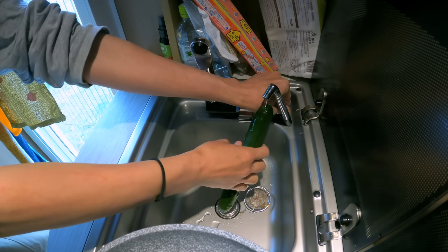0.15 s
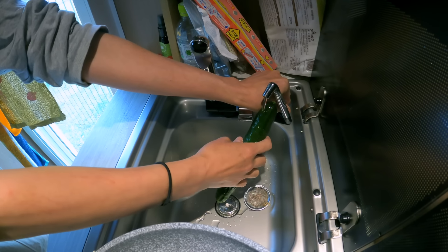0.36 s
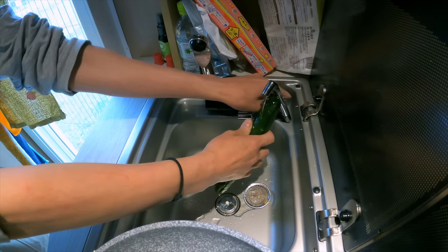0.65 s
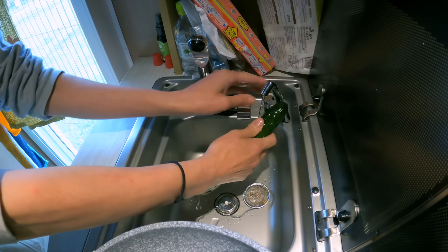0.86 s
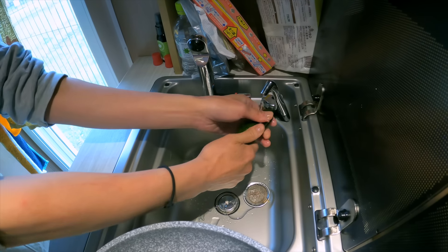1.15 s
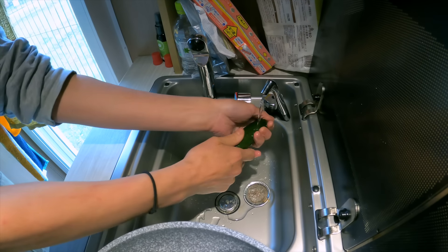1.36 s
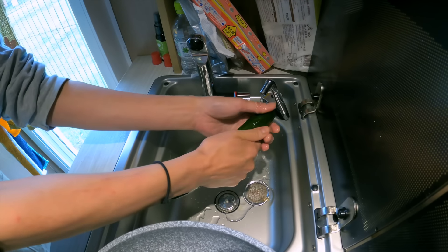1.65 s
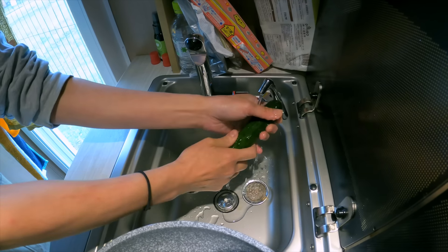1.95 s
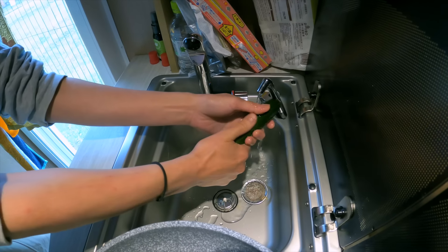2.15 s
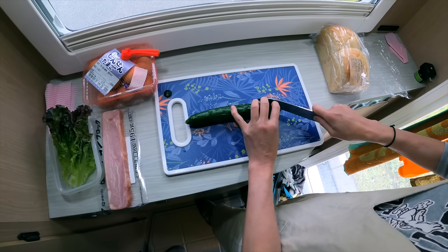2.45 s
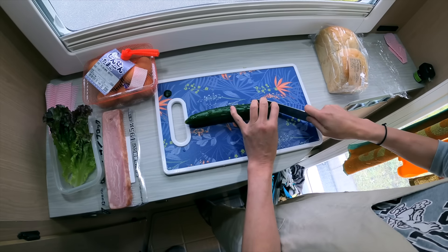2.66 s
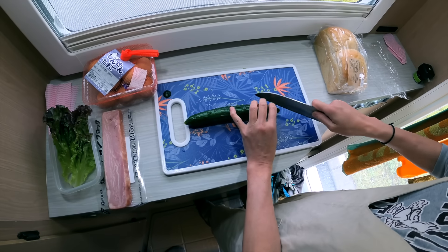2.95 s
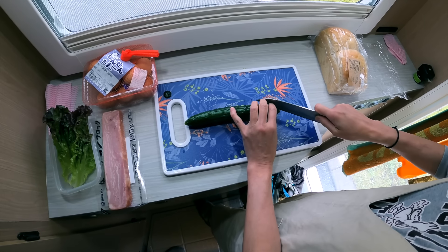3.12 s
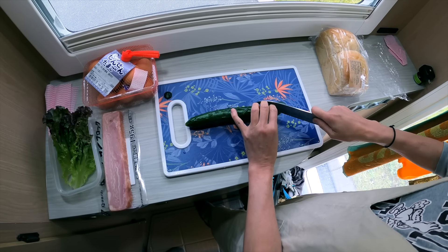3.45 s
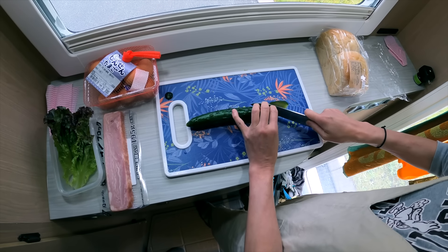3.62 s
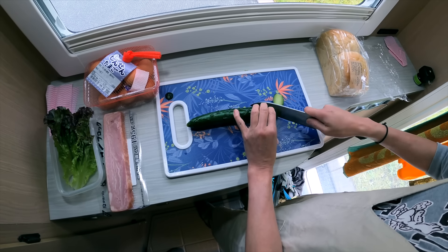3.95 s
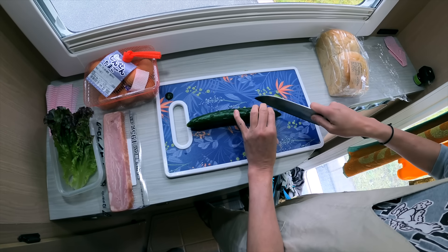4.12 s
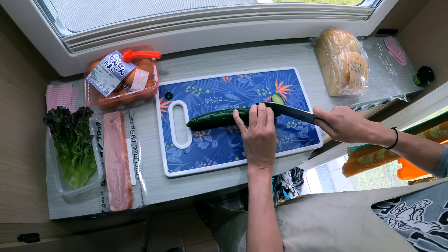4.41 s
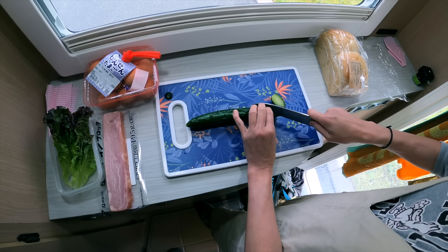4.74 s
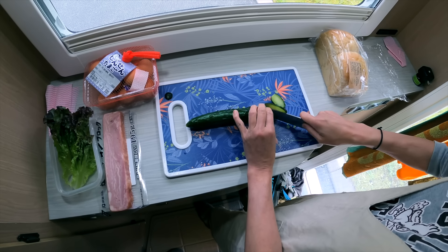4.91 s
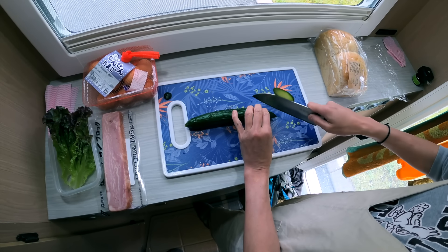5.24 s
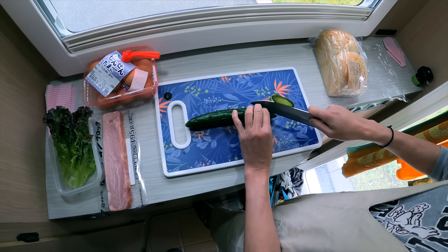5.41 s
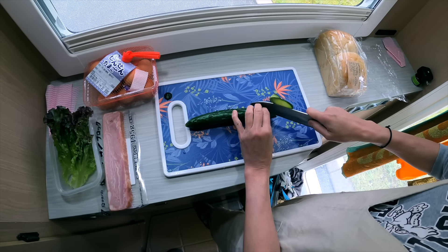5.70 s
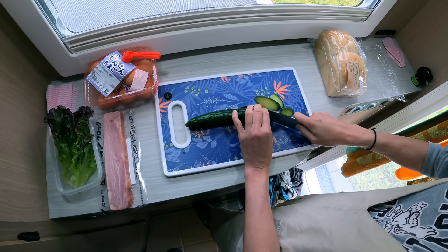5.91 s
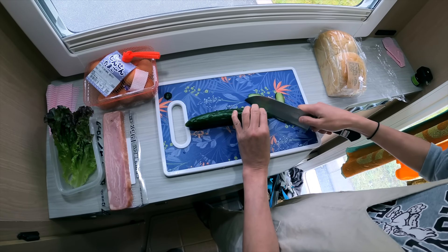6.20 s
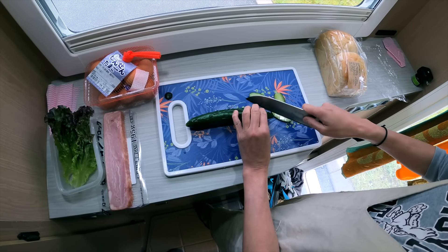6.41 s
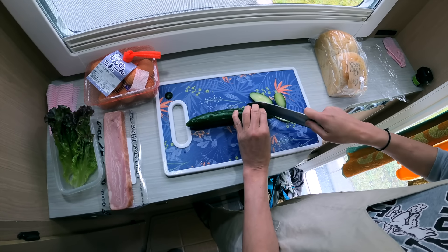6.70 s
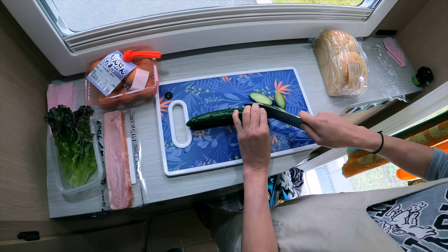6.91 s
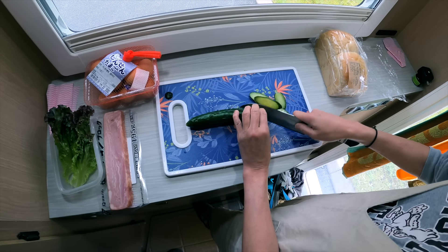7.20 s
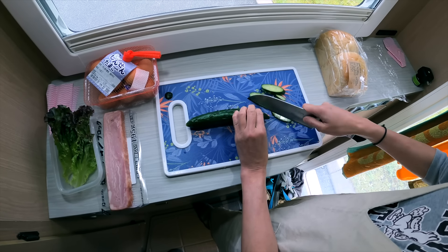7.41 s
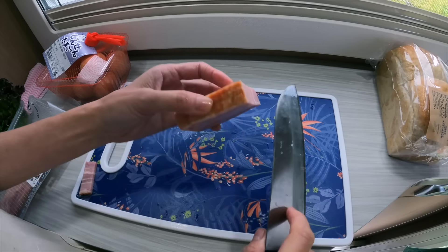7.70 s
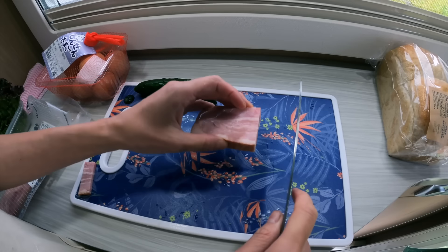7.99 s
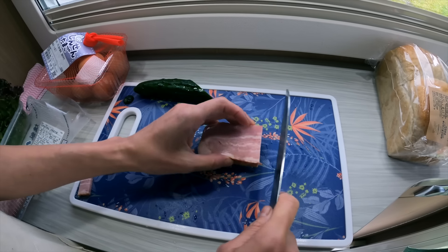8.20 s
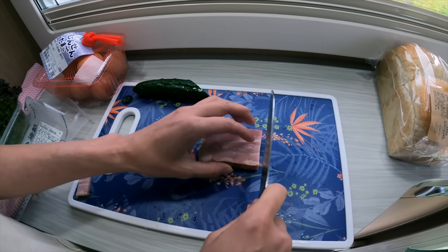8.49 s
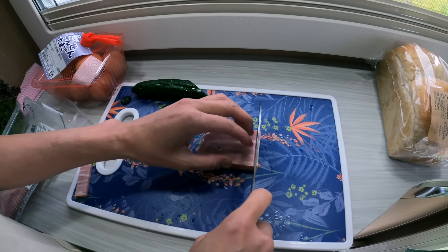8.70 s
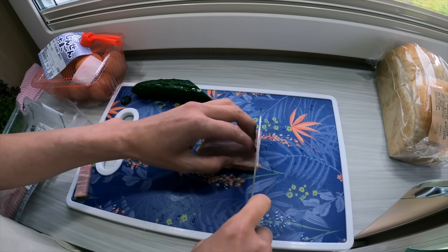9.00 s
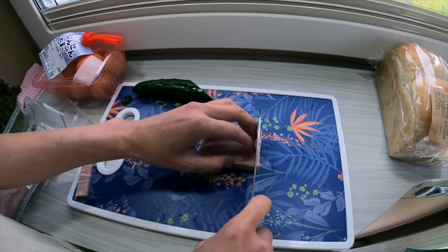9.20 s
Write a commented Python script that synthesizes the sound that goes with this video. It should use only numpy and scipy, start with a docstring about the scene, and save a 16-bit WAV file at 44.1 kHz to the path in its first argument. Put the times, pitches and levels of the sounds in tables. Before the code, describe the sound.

Water sprays into a metal sink as a pump hums, followed by five crunchy cucumber cuts knocking on a board in a small kitchen.

```python
"""A pump hums and a tap rinses a cucumber over a steel sink, with bumps, splats and drips, heard from
inside a small camper kitchen. Then, straight ahead of the stereo microphone, a knife slices the cucumber
five times: a wet hiss of bursting cells, a swelling crunch and a knock that rings the cutting board.
Slices topple and the blade taps the board. Close walls add a short tail; outside, a bird chirps faintly
over a low rumble."""
import sys
import numpy as np
from scipy import signal
from scipy.fft import rfft, irfft, next_fast_len
from scipy.io import wavfile
from scipy.ndimage import map_coordinates

SR = 44100
rng = np.random.default_rng(int(sys.argv[2]) if len(sys.argv) > 2 else 0)


def master(y):
    """Save y as 16-bit WAV."""
    cut = np.clip(np.atleast_2d(y).T, -1, 1)
    pcm = np.round(cut * 32767)  # scale
    wavfile.write(sys.argv[1], SR, pcm.astype(np.int16))


N = 412335

# Reverberation of the cabin. Each row: frequency in Hz, time to decay by 60 dB in seconds.
CABIN_DECAY = [(150, .25), (600, 0.06), (2000, 0.076), (5000, 0.08), (12000, 0.035)]
# Rumble and hiss from outside. Each row: frequency in Hz, gain in dB.
RUMBLE_SPECTRUM = [(12, -25), (20, -1), (70, -1), (97, -15.5), (121, -8), (140, 3), (173, -11.5),
                   (210, -13.5), (251, -31.5), (313, -20), (380, -31.5), (468, -30), (505, -43.5),
                   (552, -33), (700, -46), (910, -73.5), (1540, -120)]
HISS_SPECTRUM = [(130, -37.5), (220, 2), (232, -5.5), (308, -3), (374, -8.5), (408, -5), (694, -33.5),
                 (888, -29.5), (1220, -22.5), (1510, -23.5), (1800, -27), (2610, -36), (5780, -32.5),
                 (10500, -51), (15000, -70)]
# Course of the hiss. Each row: time in seconds, relative level in dB.
HISS_LEVEL = [(0, -70), (3.2, -81), (5.3, -80), (7.7, -77), (8.15, -70.5), (9.35, -71)]
# The bird beyond the walls. Each row: start in seconds, relative level in dB.
CHIRPS = [(3.213, -56.5), (4.53, -50), (5.674, -53.5), (7.632, -54.5)]
PIPS = [(7.327, -65), (7.975, -60.5), (8.038, -57.5), (8.362, -61), (8.43, -59), (8.728, -65), (8.791, -62),
        (8.852, -55.5)]

# The running tap. Each row: time in seconds, relative levels of spray and pump in dB.
FLOW = [(0, -58.5, -43), (.7, -55.5, -41), (2.1, -58, -43.5), (2.6, -56, -48.5)]
# Water spraying off the hands. Each row: frequency in Hz, gain in dB.
SPRAY_SPECTRUM = [(150, -37), (250, -1), (282, 3.5), (347, -10), (392, -10), (534, -8.5), (795, -27.5),
                  (882, -9.5), (1140, -27), (1560, -13.5), (1980, -23.5), (2950, -17.5), (5690, -21.5),
                  (11900, -36), (15500, -52.5)]
# Tones of the pump. Each row: multiple of the shaft rate, relative level in dB.
PUMP_HARMONICS = [(1, 3), (2, -32.5), (3, -22.5), (5, -19.5)]
# The steel basin and the high modes of its wall. Each row: frequency and nominal width in Hz, gain in dB.
SINK_MODES = [(61.6, 14, -3), (147, 13.4, 10), (168.6, 23.3, 5), (320, 34, -22.5), (391.2, 27.4, -11),
              (555, 50, -16.5), (968, 108, -20.5)]
SINK_WALL_MODES = [(675, 49, -12), (975, 30, -1), (1388, 28, -19.5), (1560, 69, -6)]
# Bumps on the sink. Each row: start in seconds, relative levels of the bump and its upper modes in dB.
BUMPS = [(0.713, -22.5, -15.5), (0.975, -18, -12.5), (1.382, -17.5, -18), (1.415, -21, 12),
         (1.904, -20.5, -20.5), (2.165, -24.5, -23)]
# Gobs of water landing. Each row: start in seconds, relative levels of steel ring and splash in dB.
SPLATS = [(.649, -37, -49), (.672, -42, -44), (0.738, -20.5, -28), (1.007, -37.5, -26.5),
          (1.411, -46, -40.5), (1.648, -43.5, -29.5), (2.166, -48, -72), (2.279, -46.5, -53.5),
          (2.347, -42, -53)]
# Single drips. Each row: start in seconds, relative level in dB, pitch in Hz.
DRIPS = [(0.451, -39.5, 7900), (0.47, -38, 4330), (1.411, -48, 3980), (1.629, -31.5, 5700),
         (2.097, -41.5, 6460), (2.306, -28.5, 6840), (2.447, -31, 3740), (2.527, -36.5, 3260),
         (2.724, -31, 6100), (2.771, -46, 7560)]

# The cutting board on its counter. Each row: frequency and nominal width in Hz, gain in dB.
BOARD_MODES = [(91.67, 12, 0), (148.4, 8.3, 4), (191.3, 24, 4.5), (282, 39, 10.5), (358, 17, -1),
               (471, 18, -4), (538, 33, 3), (629, 24, 1), (759.7, 30, 0.5), (849, 26, -9), (985, 90, -2),
               (1001, 57, 3.5), (1193, 46, -3.5), (1395, 28, -15.5), (1520, 140, -8), (1874, 24, -9.5),
               (1927, 70, -8), (2197, 70, -15), (2820, 40, -18.5), (3350, 77, -16), (3670, 120, -16.5),
               (3960, 43, -19)]
# Hands, food and blade rubbing. Each row: start and length in seconds, centre in Hz, relative level in dB.
RUBS = [(.41, 0.19, 345, -49), (4.383, 0.037, 5000, -68), (4.447, 0.042, 3340, -65.5),
        (5.074, .035, 5500, -71.5), (6.488, 0.058, 5410, -73.5), (6.55, .07, 6870, -64.5),
        (7.25, .09, 6300, -73.5), (8.041, .08, 5000, -72), (8.28, 0.042, 11080, -72.5),
        (8.311, 0.18, 150, -50), (8.322, 0.043, 454, -53)]
# Blade and slices touching down. Each row: time in seconds, relative low, middle and tick levels in dB.
LIGHT_TAPS = [(3.221, -50.5, -59, -66), (3.854, -33, -44, -63), (3.878, -29.5, -33.5, -68),
              (3.924, -26.5, -43, -67), (3.982, -35, -54, -65.5), (4.023, -39.5, -58.5, -61.5),
              (4.399, -49.5, -63.5, -67), (5.543, -38, -56.5, -74), (6.049, -26.5, -36.5, -55),
              (6.083, -27, -24.5, -54), (6.105, -30, -39, -46), (6.133, -33.5, -32, -57),
              (6.168, -27.5, -22, -49), (6.221, -41, -38, -64), (6.234, -34, -42, -65),
              (7.174, -43, -74, -53), (7.203, -46.5, -57, -45), (7.41, -38, -40, -56),
              (7.444, -34, -43.5, -47.5), (7.504, -41, -39, -57), (7.615, -67, -73, -60),
              (7.651, -46.5, -63, -65), (8.329, -41, -56, -63)]
# A light tick, wet flesh, breaking skin and the edge on the board. Each row: frequency in Hz, gain in dB.
TICK_SPECTRUM = [(1200, -22), (2500, 1.5), (4000, 1.5), (7000, -6), (9000, -18), (13000, -29),
                 (15500, -41.5)]
FLESH_SPECTRUM = [(120, -18), (280, -1.5), (550, -4), (800, -0.5), (1300, -16), (1900, -8.5), (2700, -18),
                  (4200, -16.5), (7500, -25), (9000, -33), (13000, -39.5), (15500, -46.5)]
CRUNCH_SPECTRUM = [(120, -46.5), (200, -7), (462, -10), (797, -7), (1450, -7), (1880, -1), (2420, -4),
                   (4570, -10.5), (5200, -19.5), (7210, -23.5), (8650, -41.5), (15500, -63)]
EDGE_SPECTRUM = [(100, -22.5), (400, -8.5), (900, 8), (1400, -5.5), (2000, 1), (2800, -14), (4000, -12.5),
                 (5500, -26.5), (8000, -39), (15000, -54.5)]
# The blade sliding through. Each row: start, time to bite in and end in seconds,
# relative levels of the stroke and of the skin's treble in dB.
STROKES = [(3.4, .11, 3.685, -50.5, -1.5), (4.725, 0.065, 4.935, -49.5, -2), (5.755, .07, 5.98, -50.5, 0.5),
           (6.85, 0.094, 7.06, -48, 3)]
# The blade landing. Each row: time in seconds, relative levels of knock, thud and crunch in dB,
# time for the crunch to swell by 60 dB in seconds.
CHOPS = [(2.678, -5, 3, -20, 0.073), (3.7676, 0, 0, -12.5, 0.064), (4.9375, -0.5, -3.5, -17, 0.065),
         (5.9692, -0.5, -4.5, -23, .06), (7.062, -2, -7.5, -29, 0.059)]

# Scatter reaching the microphone from the sides. Each row: frequency in Hz, side gain in dB.
SINK_SIDE = [(60, -15.5), (150, -29.5), (380, -18.5), (950, -11), (2380, -6), (5980, -8.5), (15000, -10.5)]
BOARD_SIDE = [(60, -27), (150, -31.5), (380, -30.5), (950, -22.5), (2380, -19.5), (5980, -16.5),
              (15000, -4)]
OUTDOOR_SIDE = [(60, -23), (150, -28), (380, -12.5), (950, -8), (2380, -5.5), (5980, -10), (15000, -3.5)]
# Treble response of the microphone. Each row: frequency in Hz, gain in dB.
MIC_RESPONSE = [(12000, -1), (13500, 2.5), (15500, -8.5)]

WATER_FADE_S, WATER_END_S = 2.55, 2.993  # the stream and pump die away between these times


def amp(db):
    return 10 ** (np.asarray(db) / 20)


def unit_rms(x):
    return x / np.sqrt(np.mean(x ** 2) + 1e-20)


def unit_peak(x):
    return x / np.abs(x).max()


def seconds(size):
    return np.arange(size) / SR


def fade(t, t60):
    """Exponential decay by 60 dB in t60."""
    return 1000.0 ** (-t / t60)


def rise(t, tau):
    """Soft onset with time constant tau."""
    return 1 - np.exp(-t / tau)


def along(points, hz):
    """Interpolate (Hz, value) points on a log axis."""
    freqs, values = np.transpose(points)
    return np.interp(np.log(hz + 1), np.log(freqs), values)


def curves(rows):
    """One value per sample for each column after the time."""
    times, *columns = np.transpose(rows)
    return [np.interp(seconds(N), times, column) for column in columns]


def gate(start, end, ramp):
    """1 between two times, dying smoothly outside."""
    t = seconds(N)
    outside = np.maximum(np.maximum(start - t, t - end), 0)
    return np.exp(-outside / ramp)


def add(track, start, sound):
    """Mix a sound in at a time in seconds."""
    part = track[round(start * SR):][:len(sound)]
    part += sound[:len(part)]


def wobble(rate, size=N):
    """A smooth random curve, rate knots a second."""
    knots = rng.standard_normal(int(size * rate / SR) + 4)
    return map_coordinates(knots, [seconds(size) * rate])


def grains(rate, spread_db, size=N):
    """Random tiny impulses of uneven strength, rate a second."""
    hits = rng.random(size) < rate / SR
    return hits * rng.standard_normal(size) * amp(spread_db * rng.standard_normal(size))


def noise_burst(t, t60):
    return rng.standard_normal(len(t)) * fade(t, t60)


def filtered(x, response):
    """x through a complex response of frequency."""
    size = next_fast_len(len(x) + SR // 4)
    return irfft(rfft(x, size) * response(np.fft.rfftfreq(size, 1 / SR)), size)[:len(x)]


def coloured(x, spectrum):
    """Minimum-phase filter with the gain of (Hz, dB) points."""
    size = 4096
    gain = amp(along(spectrum, np.fft.rfftfreq(size, 1 / SR)))
    cepstrum = irfft(np.log(gain))
    cepstrum[1:size // 2] *= 2
    cepstrum[size // 2 + 1:] = 0
    return signal.fftconvolve(x, irfft(np.exp(rfft(cepstrum))))[:len(x)]


def resonate(x, modes):
    """x through (Hz, width, dB) resonances of alternating sign, each at least 2.8% wide."""
    def mode(f, hz, width, db):
        damping = 1j * f * max(width, 0.028 * hz)
        return amp(db) * damping / (hz * hz - f * f + damping)
    return filtered(x, lambda f: sum((-1) ** k * mode(f, *row) for k, row in enumerate(modes)))


def softened(x, hz, order=2):
    """Low-pass: a soft contact excites little treble."""
    return signal.sosfilt(signal.butter(order, hz, fs=SR, output="sos"), x)


def split(x, hz):
    """The parts of x below and above a frequency."""
    high_pass = signal.butter(4, hz, "high", fs=SR, output="sos")
    return softened(x, hz, order=4), signal.sosfilt(high_pass, x)


def band_noise(size, hz, width):
    """Noise of rms 1 in one band with steep skirts."""
    band = [(hz, width, 0)]
    return unit_rms(resonate(resonate(rng.standard_normal(size), band), band))


def reflected(x, tail):
    """x smeared by a tail of unit energy."""
    return signal.fftconvolve(x, tail / np.linalg.norm(tail))[:len(x)]


def cabin(x, wet_db):
    """Close walls add a short dense tail, 2.5 ms behind the direct sound."""
    hz, t, noise = signal.stft(rng.standard_normal(SR // 4), SR, nperseg=128)
    tail = signal.istft(noise * fade(t, along(CABIN_DECAY, hz)[:, None]), SR, nperseg=128)[1]
    return x + amp(wet_db) * reflected(x, np.pad(tail, (SR // 400, 0)))


def outdoor_air():
    """Farthest back, a low rumble and a thin hiss from outside."""
    hiss_db, = curves(HISS_LEVEL)
    rumble = amp(-48.5 + 1.1 * wobble(7.6)) * unit_rms(coloured(rng.standard_normal(N), RUMBLE_SPECTRUM))
    hiss_gain = amp(hiss_db + 12.5 + 0.64 * wobble(8.3))
    return rumble + hiss_gain * unit_rms(coloured(rng.standard_normal(N), HISS_SPECTRUM))


def whistle(length_s, from_hz, to_hz, buzz):
    """One gliding bird note with a fast flutter in its pitch."""
    t = seconds(int(length_s * SR))
    flutter = buzz * np.sin(2 * np.pi * 190 * t) + 0.025 * wobble(600, len(t))
    hz = np.linspace(from_hz, to_hz, len(t)) * (1 + flutter)
    return np.hanning(len(t)) * np.sin(2 * np.pi * np.cumsum(hz) / SR)


def bird():
    """Buzzy falling chirps, short pips and a twitter, blurred by walls and a faint outdoor echo."""
    song = np.zeros(N)
    for start, db in CHIRPS:
        add(song, start, amp(db) * whistle(length_s=0.088, from_hz=5550, to_hz=3000, buzz=0.085))
    for start, db in PIPS:
        add(song, start, amp(db) * whistle(length_s=0.035, from_hz=4400, to_hz=4200, buzz=0.025))
    for start in 7.865 + 0.024 * np.arange(3):  # a twitter of downward flicks
        add(song, start, amp(-58.5) * whistle(length_s=0.0208, from_hz=5600, to_hz=3200, buzz=0.025))
    echo = reflected(song, noise_burst(seconds(SR // 2), t60=0.45))
    return amp(-6.5) * cabin(song, wet_db=1) + amp(-14.5) * echo


def pump(shaft_hz):
    """The water pump hums at multiples of its slightly unsteady shaft rate."""
    phase = 2 * np.pi * np.cumsum(shaft_hz * (1 + 0.0024 * wobble(14))) / SR
    return unit_rms(sum(amp(db + 1.7 * wobble(17)) * np.sin(k * phase) for k, db in PUMP_HARMONICS))


def droplets(count, hz, spread_db):
    """Tiny bubbles ring for a few cycles, each at its own pitch."""
    out, t = np.zeros(N), seconds(SR // 50)
    starts = rng.uniform(0, WATER_FADE_S, count)
    for start, (pitch, strength) in zip(starts, rng.standard_normal((count, 2))):
        cycles = t * min(hz * np.exp(0.4 * pitch), 12000)
        ping = np.sin(2 * np.pi * cycles) * fade(cycles, t60=16) * rise(cycles, tau=2)
        add(out, start, amp(spread_db * strength) * ping)
    return cabin(out, wet_db=4.5)


def running_tap():
    """The pump hums; its stream sprays off the hands, spits droplets and drums on the sink."""
    spray_db, pump_db = curves(FLOW)
    drops = coloured(grains(rate=8800, spread_db=1.5), SPRAY_SPECTRUM)
    spray = unit_rms(cabin(drops, wet_db=-7.5))
    spray *= amp(spray_db + 4 + 0.7 * wobble(10) + 1.1 * wobble(32))
    spit = amp(spray_db + 14.5) * droplets(count=220, hz=5800, spread_db=3.5)
    basin = resonate(grains(rate=550, spread_db=1), SINK_MODES)
    drum = amp(spray_db + 18) * unit_rms(softened(basin, hz=1012))
    hum = amp(pump_db + 4) * pump(shaft_hz=172.3)
    dying = np.interp(seconds(N), [WATER_FADE_S, WATER_END_S], [1, 0]) ** 1.5
    return (spray + spit + drum + hum) * dying


def sink_bumps():
    """Soft pushes make the sink boom; harder ones wake its upper modes."""
    out = np.zeros(N)
    push = softened(signal.unit_impulse(SR // 3), hz=756, order=4)
    boom, upper = split(resonate(push, SINK_MODES), hz=256)
    for start, db, hard_db in BUMPS:
        clang = amp(hard_db + 3.5) * unit_peak(cabin(upper, wet_db=-7.5))
        add(out, start, amp(db - 0.5) * unit_peak(unit_peak(boom) + clang))
    return out


def water_burst(hz, width, t60):
    """Water landing: a band of noise that rises fast and dies away."""
    t = seconds(SR // 4)
    return band_noise(len(t), hz, width) * fade(t, t60) * rise(t, tau=0.0017)


def splats():
    """Gobs of water splash and ring the steel; single drips plink, each in its own band."""
    out = np.zeros(N)
    for start, steel_db, splash_db in SPLATS:
        slap = water_burst(hz=1230, width=1450, t60=0.065)
        ring = unit_peak(resonate(slap, SINK_WALL_MODES)) + amp(2.5) * unit_peak(slap)
        splash = water_burst(hz=3550, width=2250, t60=0.076)
        add(out, start, amp(steel_db) * ring + amp(splash_db) * splash)
    for start, db, hz in DRIPS:
        add(out, start, amp(db) * water_burst(hz, width=0.44 * hz, t60=0.027))
    return softened(out, hz=9440)


def rubs():
    """Brief strokes of friction from hands, food and blade swell and fade."""
    out = np.zeros(N)
    for start, length, hz, db in RUBS:
        swell = np.hanning(int(length * SR))
        add(out, start, amp(db) * swell * band_noise(len(swell), hz, width=0.9 * hz))
    return cabin(out, wet_db=-2)


def board_spot(spread_db):
    """Each spot on the board mixes its modes anew."""
    return np.array(BOARD_MODES) + np.outer(rng.standard_normal(len(BOARD_MODES)), [0, 0, spread_db])


def light_taps():
    """Wet slices slap and flop, the blade ticks, and the board answers."""
    out, t = np.zeros(N), seconds(SR // 5)
    press = rise(t, tau=0.0015)  # soft contacts take a moment to press home
    for time, low_db, middle_db, tick_db in LIGHT_TAPS:
        spot = board_spot(spread_db=2)
        ring = resonate(noise_burst(t, t60=0.0068), spot)
        deep, bright = split(split(ring, hz=330)[1], hz=700)
        slap = band_noise(len(t), hz=920, width=700) * fade(t, t60=0.05)
        flop = band_noise(len(t), hz=320, width=260) * fade(t, t60=0.068)
        low = unit_peak(softened(unit_peak(deep) + unit_peak(flop), hz=795, order=4))
        middle = unit_peak(softened(unit_peak(slap) + amp(-7) * unit_peak(bright), hz=2886, order=3))
        tick = unit_peak(coloured(noise_burst(t, t60=0.055) * rise(t, tau=0.002), TICK_SPECTRUM))
        contact = amp(low_db + 4.5) * low + amp(middle_db + 8.5) * middle + amp(tick_db + 7.5) * tick
        add(out, time - 0.002, press * contact)
    return cabin(out, wet_db=-7)


def slicing(bite_db=27, push_db=14, push_s=0.04):
    """Cells burst in turn as the blade bites in, slides through and is pushed home; the board rings."""
    out, t = np.zeros(N), seconds(N)
    cells = unit_rms(coloured(grains(rate=6000, spread_db=2), FLESH_SPECTRUM))
    skin = split(cells, hz=5030)[1]
    flesh = softened(cells, hz=4960, order=4) + amp(-5) * unit_rms(resonate(cells, BOARD_MODES))
    for start, bite_s, end, db, skin_db in STROKES:
        bite_left = np.clip(1 - (t - start) / bite_s, 0, 1)
        level = amp(db - bite_db * bite_left) * gate(start, end, ramp=0.009)
        out += level * (flesh + amp(skin_db) * skin)
    # the hand pushes harder just before the blade lands
    push = sum(np.interp(t, [landing - push_s, landing], [0, 1], right=0) for landing, *_ in CHOPS)
    return cabin(amp(3 + push_db * push + 1.1 * wobble(25)) * out, wet_db=-4.5)


def crunches():
    """The blade speeds through the last skin: a crackle that swells to the landing and shakes the board."""
    bursts, t = np.zeros(N), seconds(SR // 10)
    for landing, _, _, db, swell_s in CHOPS:
        cracks = unit_rms(grains(rate=9000, spread_db=3.5, size=len(t)))
        add(bursts, landing - t[-1], amp(db + 12) * cracks * fade(t[::-1], t60=swell_s))
    crackle = coloured(bursts, CRUNCH_SPECTRUM)
    ring = softened(resonate(crackle, BOARD_MODES), hz=6000)
    return cabin(crackle, wet_db=-5.5) + amp(8) * ring


def chops():
    """The edge lands with a sharp click, the board rings and, a moment later, the counter thuds."""
    out, t = np.zeros(N), seconds(SR // 3)
    blow = signal.unit_impulse(len(t))
    for landing, db, thud_db, *_ in CHOPS:
        grind = amp(-19) * noise_burst(t, t60=0.014)  # the edge grinds to a stop
        click = unit_peak(coloured(blow + grind, EDGE_SPECTRUM))
        board = softened(resonate(blow, board_spot(spread_db=1)), hz=4600, order=4)
        thud, ring = map(unit_peak, split(board, hz=415))
        add(out, landing, amp(db) * (amp(-3) * cabin(click, wet_db=-9) + amp(-6.5) * ring))
        add(out, landing + 0.0022, amp(db + thud_db - 8.5) * thud)
        add(out, landing + 0.009, amp(db - 11) * softened(click, hz=2200))  # the nearest wall answers
    return out


def mic_pair(mid, aside, side_spectrum):
    """Two close microphone ports hear the same sound, plus what scatters in from the sides."""
    scatter = noise_burst(seconds(SR // 25), t60=0.12)
    side = coloured(reflected(aside, scatter), side_spectrum)
    return np.array([mid + side, mid - side])


def scene():
    """From the microphone, the sink scatters widely, the board lies ahead, the outdoors is all around."""
    sink = running_tap() + sink_bumps() + splats()
    board = slicing() + crunches() + chops() + light_taps() + rubs()
    song = bird()
    indoors = mic_pair(sink, sink, SINK_SIDE) + mic_pair(board, board, BOARD_SIDE)
    return indoors + mic_pair(song + outdoor_air(), song + outdoor_air(), OUTDOOR_SIDE)


def record(dry):
    """The microphone lifts slightly near 13.5 kHz, then rolls off to its band limit."""
    limit_hz = 15550
    return np.array([filtered(x, lambda hz: amp(along(MIC_RESPONSE, hz)) * (hz < limit_hz)) for x in dry])


dry = scene()
out = record(dry)
master(out)
```